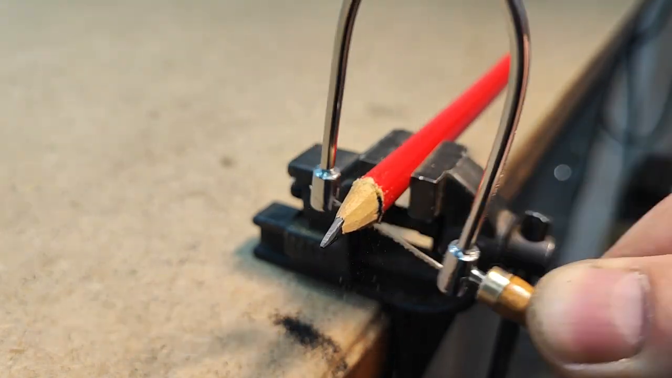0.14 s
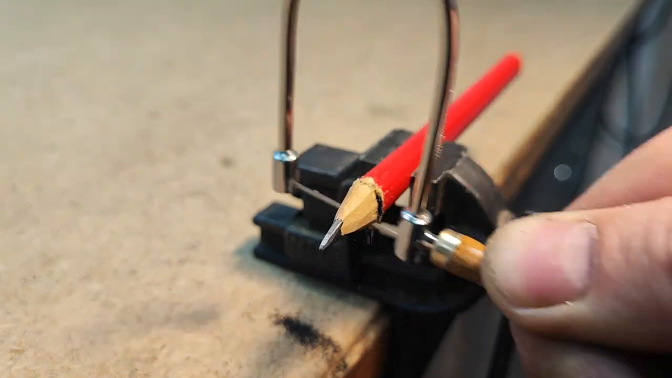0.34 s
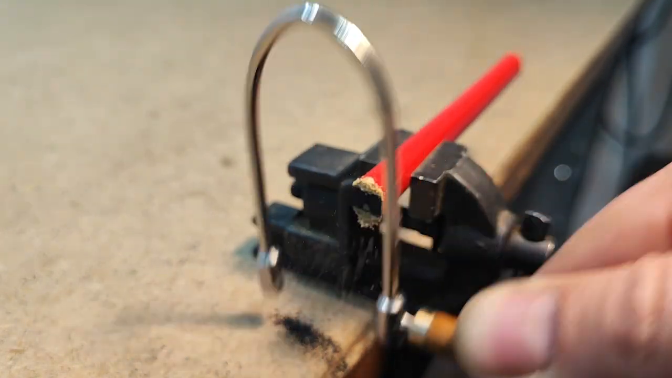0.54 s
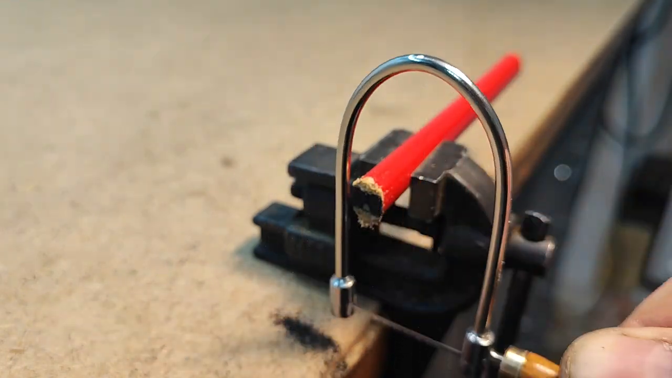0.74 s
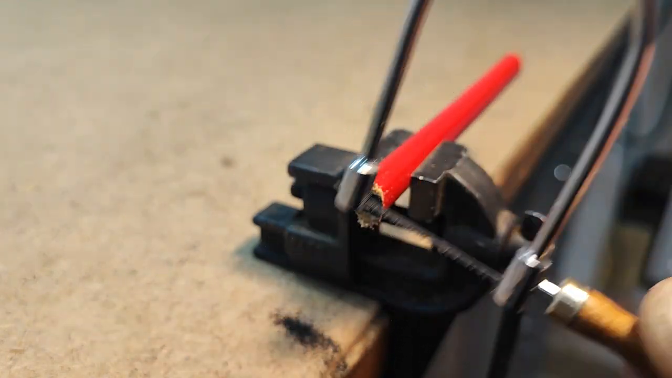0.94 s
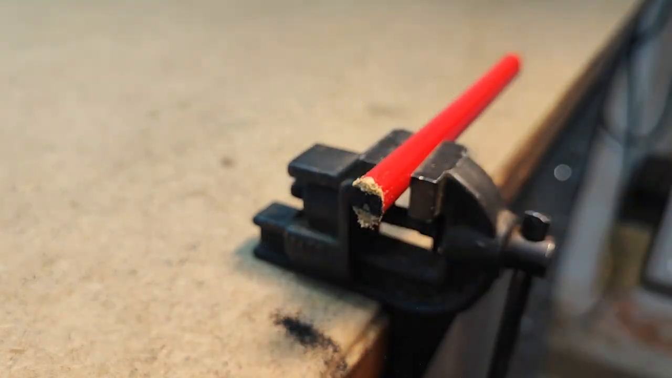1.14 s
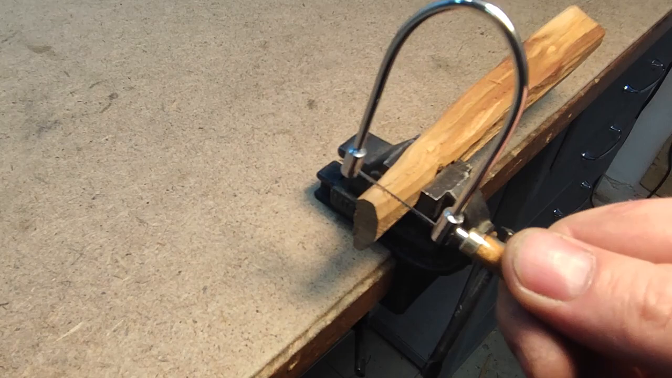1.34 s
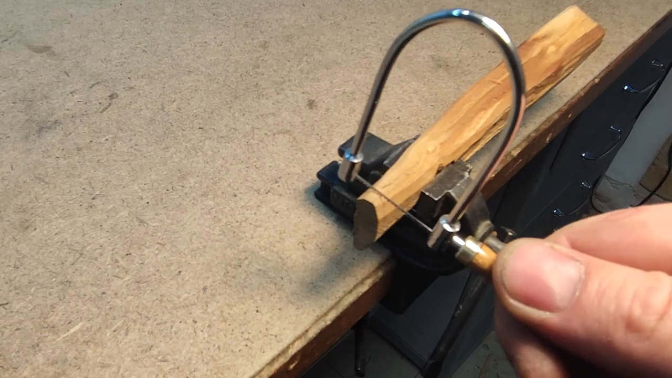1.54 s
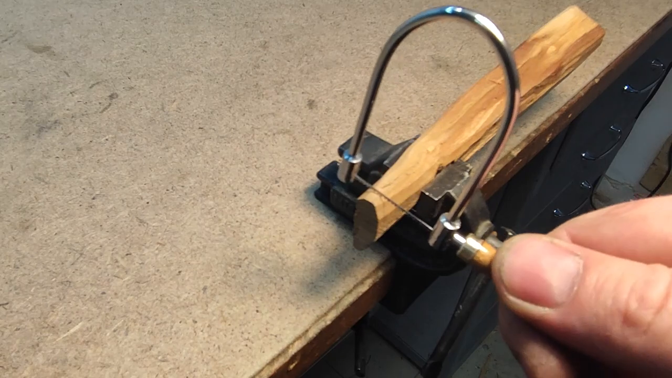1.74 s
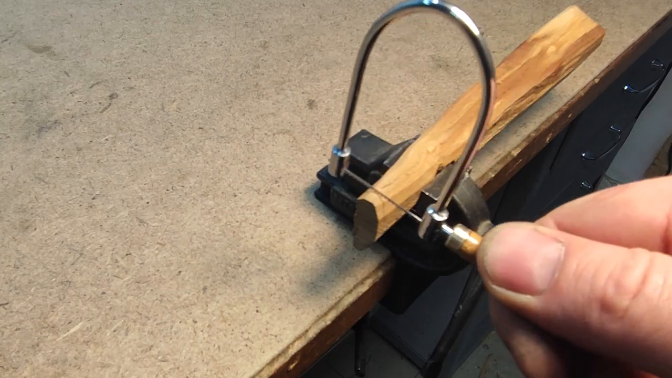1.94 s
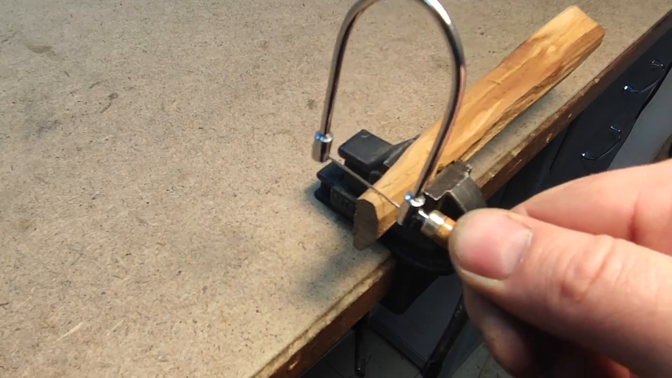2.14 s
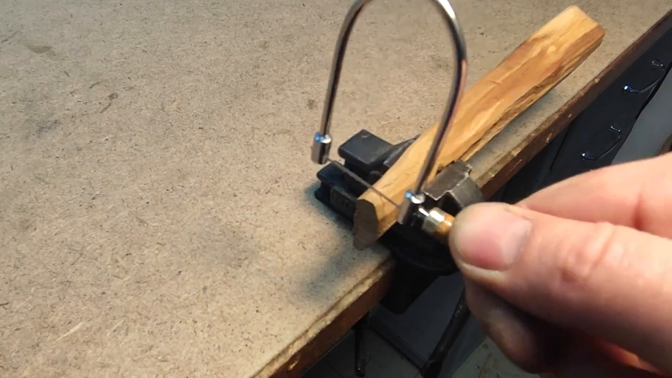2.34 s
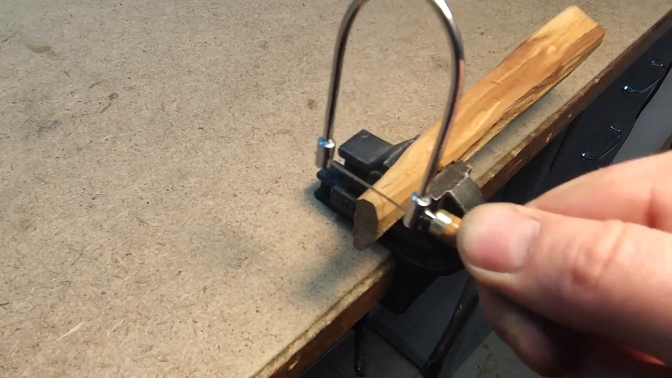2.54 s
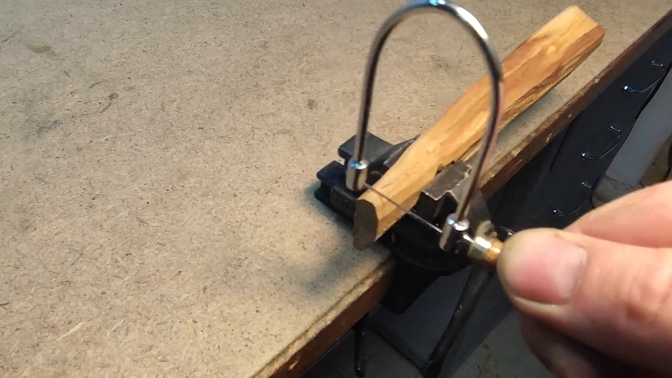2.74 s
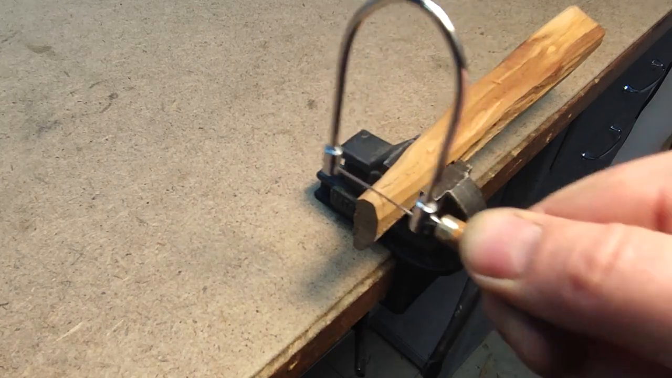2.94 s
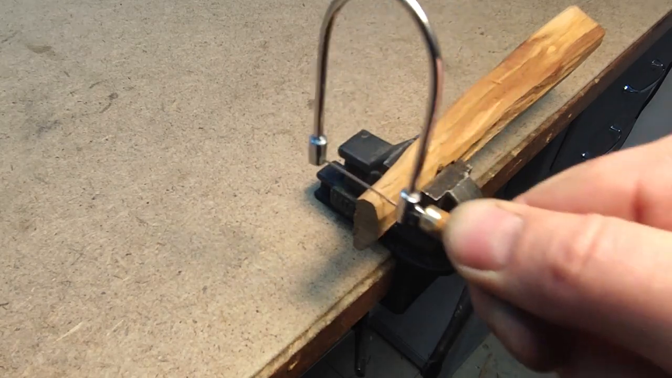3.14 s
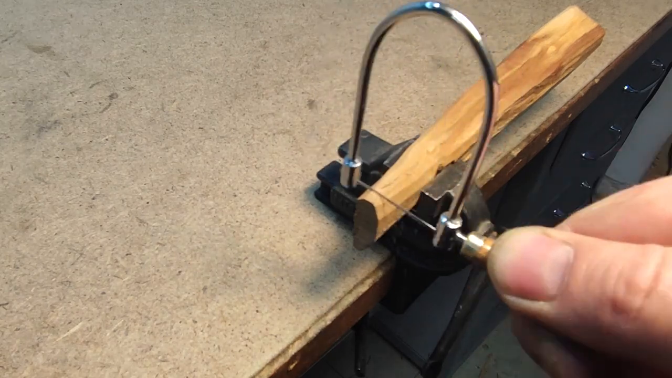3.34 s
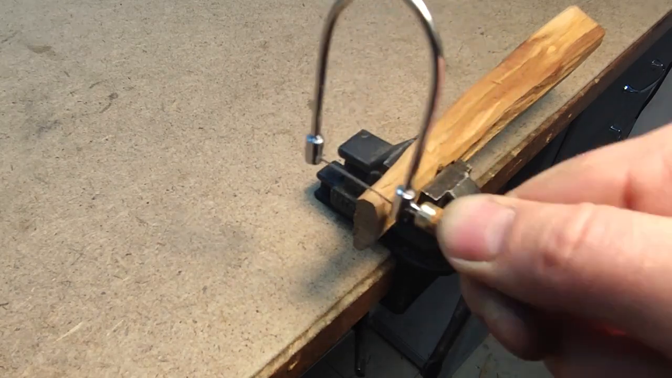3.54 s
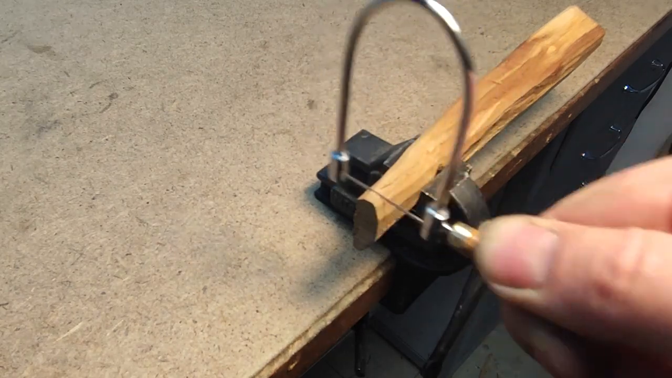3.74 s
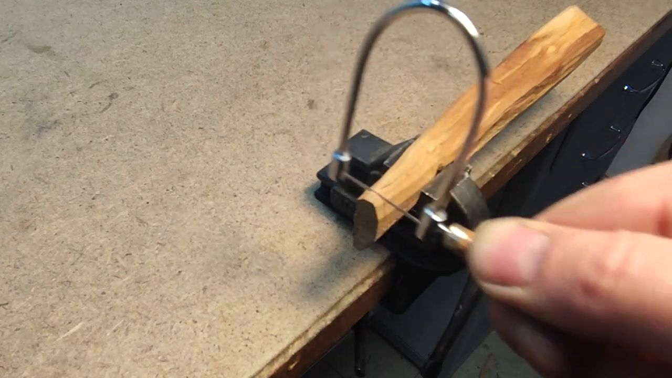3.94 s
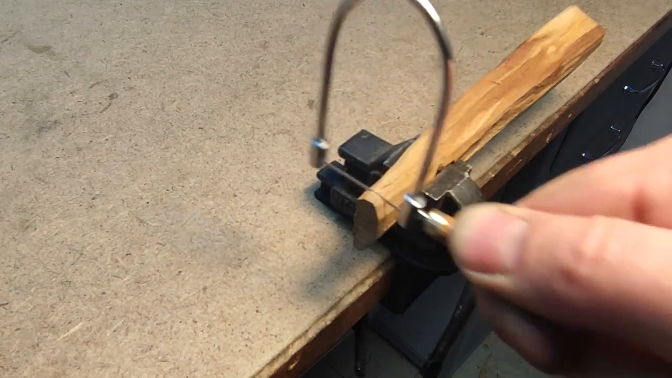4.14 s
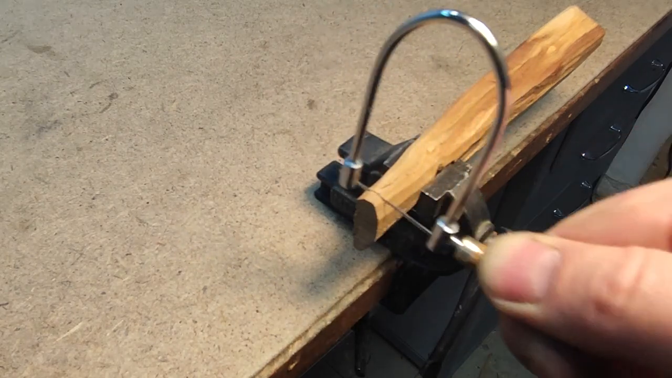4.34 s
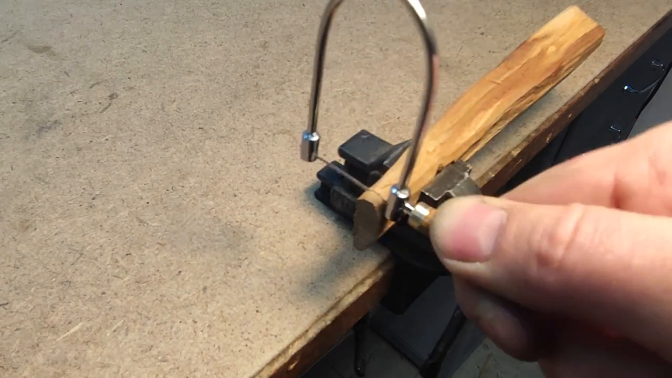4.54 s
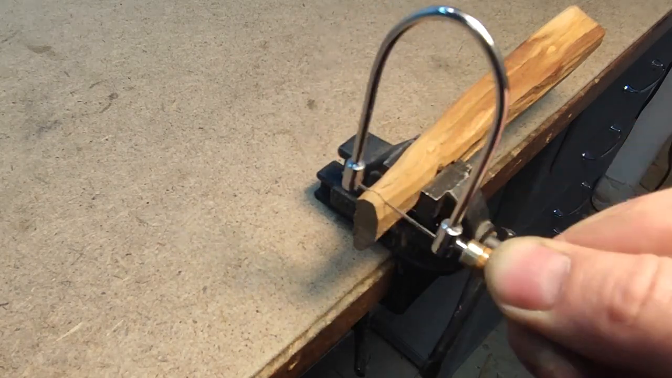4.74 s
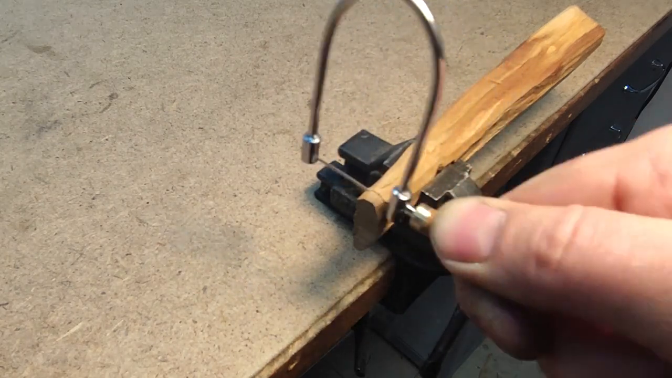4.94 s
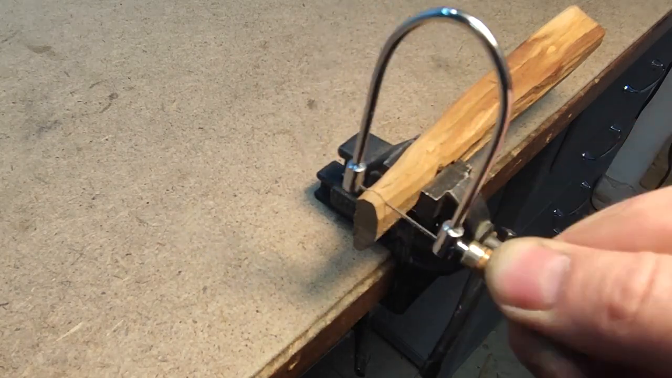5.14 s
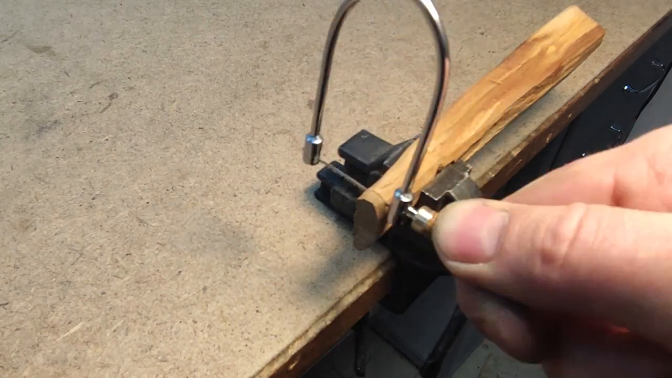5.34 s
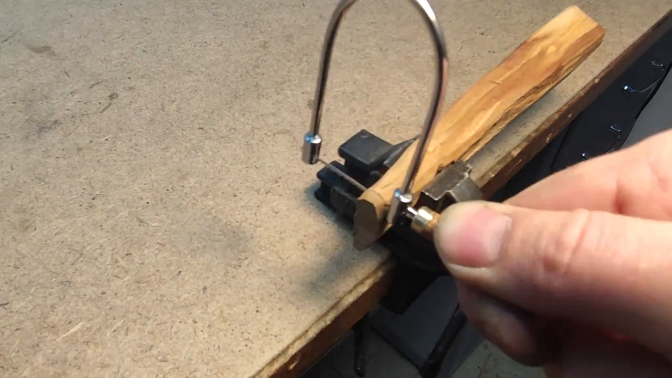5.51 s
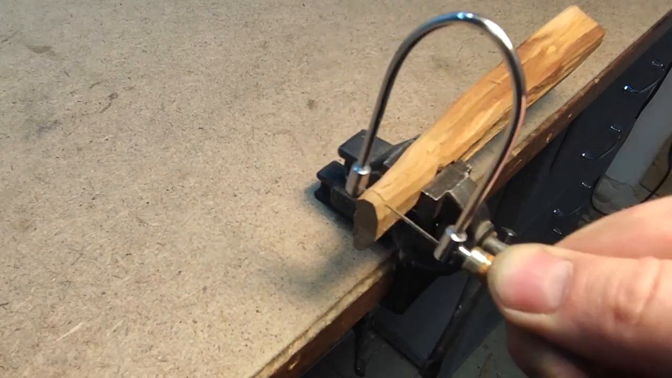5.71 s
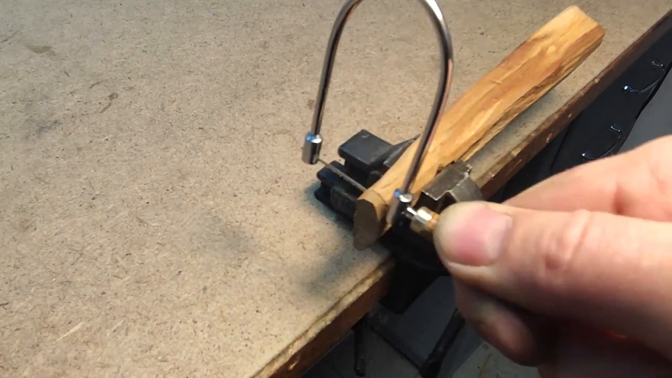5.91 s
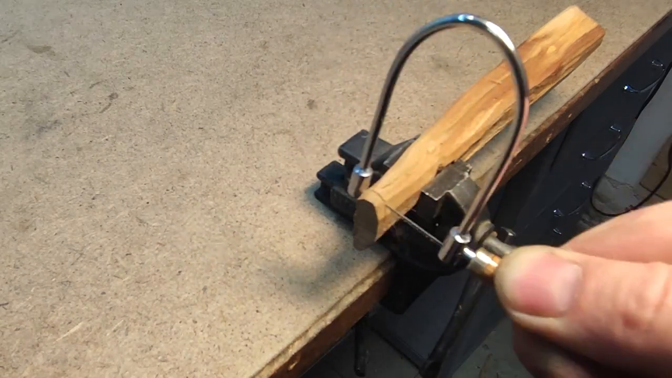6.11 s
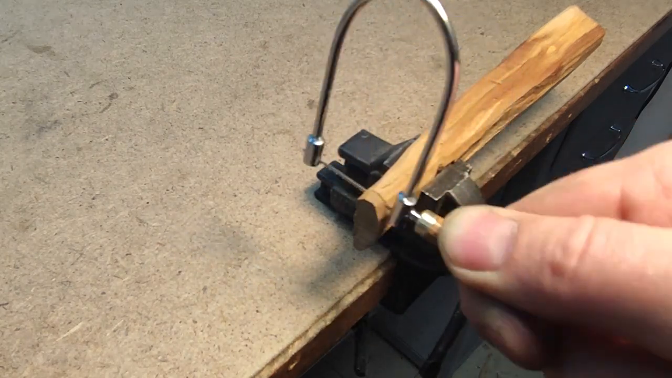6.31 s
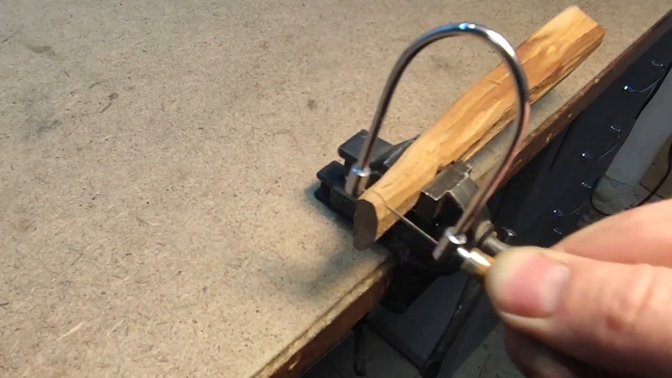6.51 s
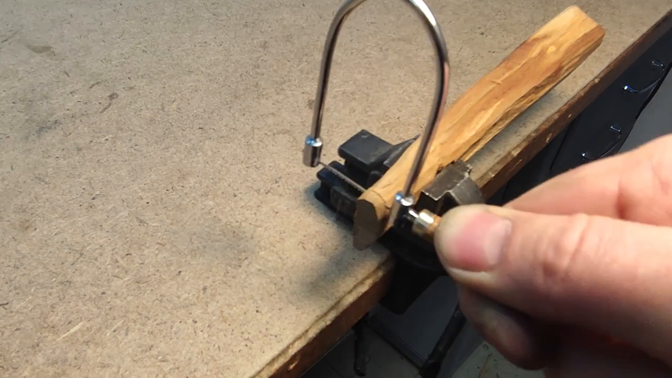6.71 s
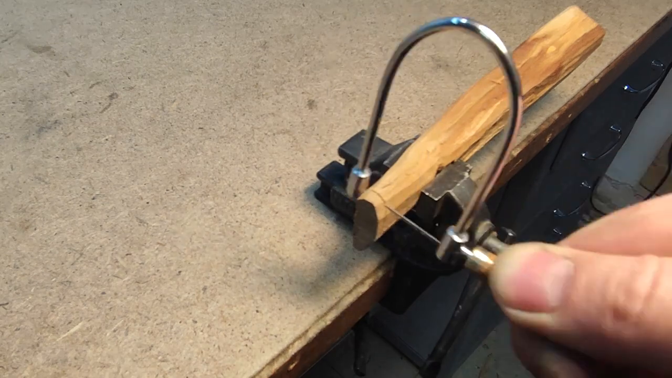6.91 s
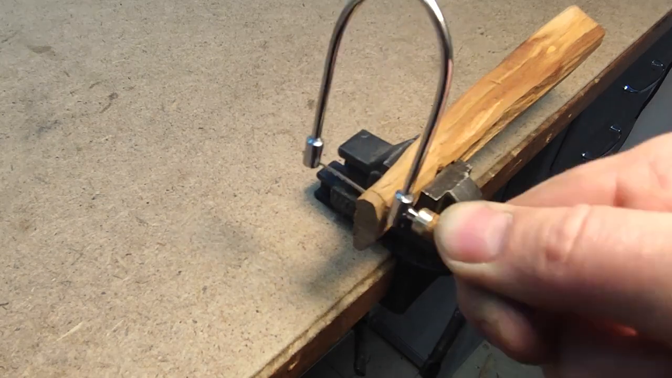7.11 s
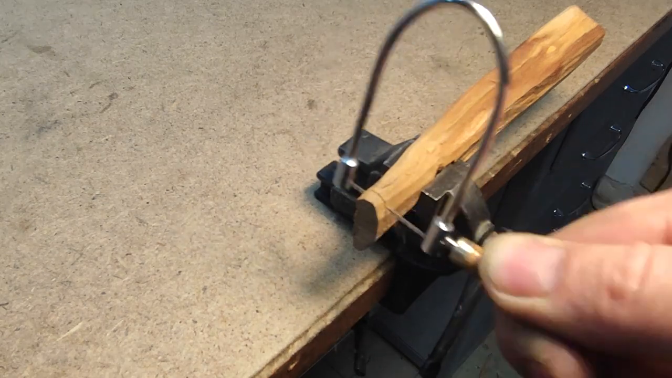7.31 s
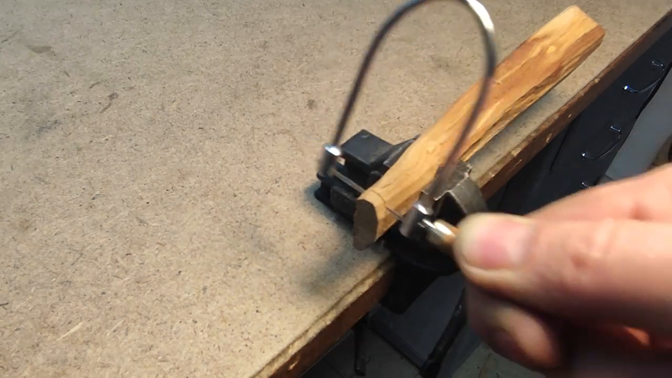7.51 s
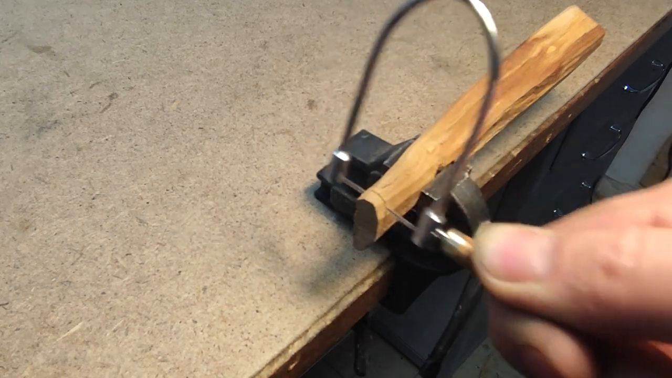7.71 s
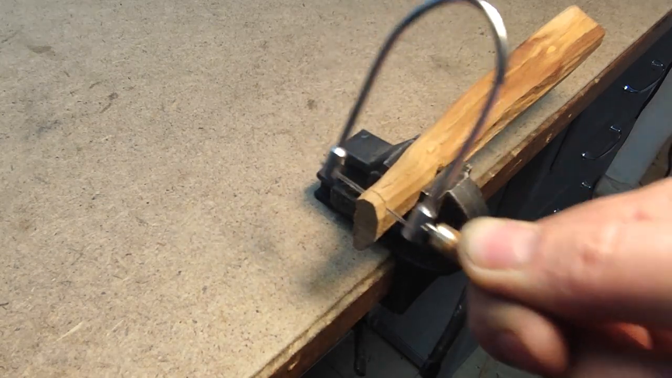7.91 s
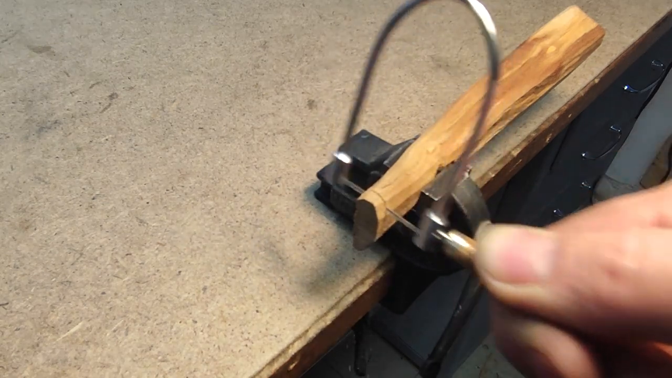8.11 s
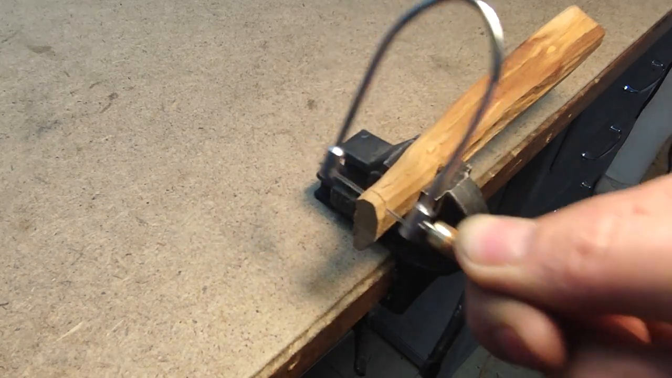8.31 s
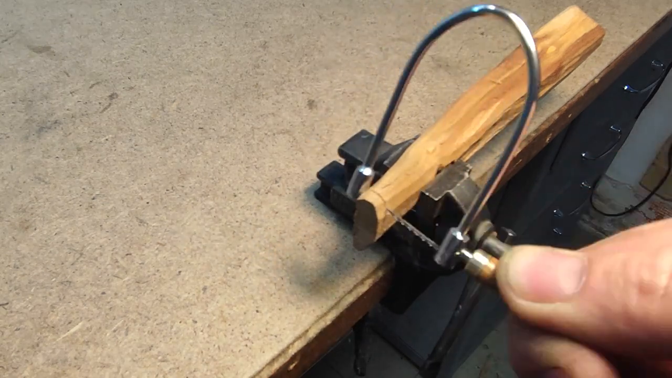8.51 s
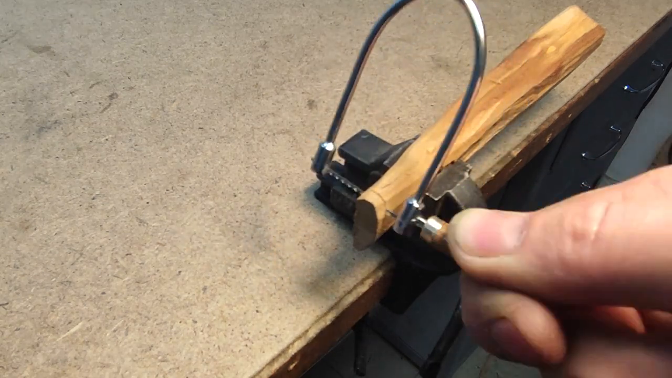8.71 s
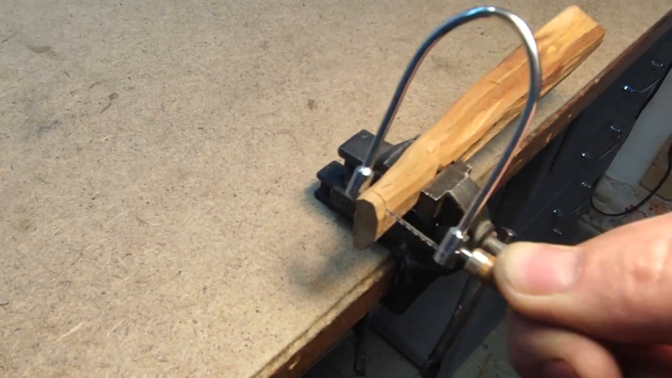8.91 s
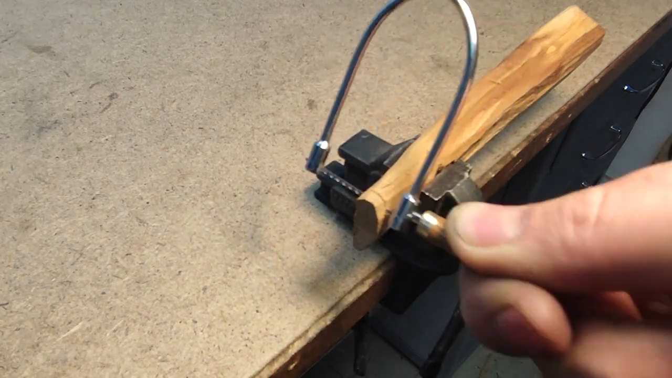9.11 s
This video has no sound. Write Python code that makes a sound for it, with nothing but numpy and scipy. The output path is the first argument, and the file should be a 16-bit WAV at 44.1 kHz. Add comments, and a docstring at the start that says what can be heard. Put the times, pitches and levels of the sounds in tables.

```python
"""A small coping saw works in quick, short strokes on a workbench, in a quiet room.
It cuts a pencil clamped in a little vise; the tip snaps off and rattles down. After a pause, with bumps
and a scuff, the blade is set on a wooden stick and saws about seven times a second to and fro.
Trains of tooth blows and noise of tearing fibres drive resonances of saw frame, wood and bench.
Decaying noise bursts make the cracks, bumps and scrapes; a short reverberation and room tone surround them."""
import sys
import numpy as np
from scipy import signal
from scipy.fft import rfft, irfft, next_fast_len
from scipy.io import wavfile

SR = 44100
rng = np.random.default_rng(int(sys.argv[2]) if len(sys.argv) > 2 else 0)


def store_pcm(level_fs):
    """Save levels as 16-bit WAV."""
    pcm = np.round(np.clip(level_fs, -1, 1) * 32767).astype(np.int16)
    wavfile.write(sys.argv[1], SR, np.atleast_2d(pcm).T)


N = 403956

# Resonant modes of the bench and of the clamped wood, as relative gains:
# (frequency [Hz], bandwidth [Hz], left [dB], right [dB])
BENCH_MODES = [(35, 60, -18, -17), (94.5, 14.5, -1.5, -6), (161.3, 45, -8, -11), (237, 56, -4, -3.5)]
WOOD_MODES = [(344, 30, -1, -.5), (414.7, 20.7, -1, 0.5), (512.6, 30, -4.5, -1), (570, 55, -5.5, -1.5),
              (616, 50, -8.5, -28), (717.5, 51, -6.5, -40), (782, 30, -17.5, -17), (885, 43, -12, -14),
              (967.4, 40, -9.5, -7), (1043, 65, -15.5, -16.5)]


def amp(db):
    """Level law: decibels to amplitude gain."""
    return 10 ** (np.asarray(db) / 20)


def unit(x):
    """Power normalisation: x scaled to rms 1."""
    return x / np.sqrt(np.mean(x ** 2) + 1e-20)


def along(points, hz):
    """Spectral envelope: (frequency, value) points interpolated on a logarithmic frequency axis."""
    point_hz, values = np.transpose(points)
    return np.interp(np.log(hz + 1), np.log(point_hz + 1), values)


def grid(size=4096):
    """Sampled spectrum: bin frequencies [Hz] of a short response, shifted by 1 Hz to avoid zero."""
    return np.fft.rfftfreq(size, 1 / SR) + 1


def resonances(modes):
    """Modal superposition: the powers of second-order resonances add, giving left and right gains."""
    hz = grid()
    power = 0
    for mode_hz, width_hz, left_db, right_db in modes:
        detuning = (hz * hz - mode_hz * mode_hz) / (hz * width_hz)
        power = power + amp([[left_db], [right_db]]) ** 2 / (1 + detuning ** 2)
    return np.sqrt(power)


def below(edge_hz, order=4):
    """Low-pass filtering: Butterworth gain that rolls off above an edge."""
    return 1 / np.sqrt(1 + (grid() / edge_hz) ** (2 * order))


def ring(gain):
    """Minimum phase: folding the cepstrum of a gain yields its causal impulse response, energy 1."""
    cepstrum = irfft(np.log(np.maximum(gain / gain.max(), 1e-6)))
    half = cepstrum.shape[-1] // 2
    fold = np.r_[1, np.full(half - 1, 2), 1, np.zeros(half - 1)]
    response = np.atleast_2d(irfft(np.exp(rfft(cepstrum * fold))))
    return response / np.sqrt(np.mean(np.sum(response ** 2, axis=1)))


def convolve(x, response):
    """Linear response: each channel convolved with an impulse response."""
    return signal.fftconvolve(np.atleast_2d(x), response, axes=1)


def sing(x, hz, width_hz, gain):
    """Resonant emphasis: one narrow mode is added on top of x."""
    return x + gain * signal.lfilter(*signal.iirpeak(hz, hz / width_hz, SR), x)


def echoes(t60, seconds):
    """Reverberation: exponentially decaying noise, independent on each side, energy 1."""
    t = np.arange(int(seconds * SR)) / SR
    tail = rng.standard_normal((2, len(t))) * amp(-60 * t / t60)
    return tail / np.linalg.norm(tail, axis=1, keepdims=True)


def diffuser(t60):
    """Phase dispersion: smears a tick in time on each side, with the spectrum mostly flattened."""
    spectrum = rfft(echoes(t60, seconds=.04), 4096)
    flattened = spectrum / np.abs(spectrum) ** .8
    return np.roll(irfft(flattened), 64, axis=1)[:, :2048]


def add(track, s, sound):
    """Superposition: mixes a sound into the track from time s, cut at the end."""
    start = max(round(s * SR), 0)
    track[:, start:start + sound.shape[1]] += sound[:, :max(N - start, 0)]


def follow(curve, s):
    """Linear interpolation: each column of a (time, ...) curve at time s."""
    times, *columns = np.transpose(curve)
    return np.array([np.interp(s, times, column) for column in columns])


def room_tone(db):
    """Stationary background noise: Gaussian noise shaped into a faint rumble and hiss."""
    # Relative spectral density of the room: (frequency [Hz], level [dB])
    room_spectrum = [(15, -14), (28, -8), (55, -4), (120, -11.5), (220, -12), (400, -19), (1000, -25.5),
                     (4500, -31.5), (8000, -36), (15800, -36.5)]
    colour = amp(along(room_spectrum, np.fft.rfftfreq(N, 1 / SR)))
    noise = rng.standard_normal((2, N))
    return amp(db) * unit(irfft(rfft(noise) * colour, N))


def strokes(pace, levels, favoured):
    """Reciprocating motion: timing, effort, tooth rate, ring and layer levels of every stroke."""
    # Nominal gesture, one row for the return, one for the cut:
    # (fastest part of stroke [0-1], hardest part of stroke [0-1], top rate of tooth blows [Hz])
    gesture = [(.43, .55, 184.8), (.49, .53, 221.2)]
    # The loose return wanders more; return, then cut: log scatter of (tooth rate [1], favoured ring [1])
    stray = [(.12, .22), (.03, .1)]
    # The return drags the teeth backwards and is softer: offset of (rasp [dB], wood [dB], bench [dB])
    return_offset_db = (-3, -2.5, -3)
    # No two strokes are quite alike: standard deviation of (rasp [dB], wood [dB], bench [dB])
    stroke_scatter_db = (.6, 1, 2)
    # Strokes that stand out, with their own bench and wood levels, tooth rate and ring:
    # (time [s], bench offset [dB], tooth rate [Hz], wood offset [dB], favoured ring [Hz])
    standout_strokes = [(.04, 1, 160.7, 0.5, 510), (.2, 3, 91.2, 1, 419), (2.7, 7, 225.6, 2.5, 414),
                        (2.78, 5, 214, 0, 344), (3.17, 6.5, 165.6, 1, 353), (3.39, 8, 227.8, -1.5, 340),
                        (3.88, 9, 165.6, -0.5, 385), (4.02, 5.5, 162.4, 0.5, 415), (4.36, 6, 225.7, 1, 413),
                        (4.5, 5.5, 225.7, 0.5, 412), (4.64, 4, 220.7, 0.5, 440), (4.92, 4.5, 210.2, 1, 350),
                        (5.06, 4.5, 212, -2, 563), (5.12, 5, 203.5, -1, 734), (5.19, 5, 220.6, 1, 352),
                        (5.26, -3, 210.4, 1.5, 414), (5.33, 0, 210, 1, 414), (5.4, 4, 162, 1, 410),
                        (5.47, -6, 205.3, 0, 415), (5.6, 5.5, 203.2, 2.5, 560), (5.74, 9, 228.3, -2.5, 540),
                        (5.87, -0.5, 240.6, 0.5, 516), (6.15, 6.5, 225, 0, 550), (6.69, 5.5, 223.4, 1, 403),
                        (6.96, 11, 226, -0.5, 420), (7.09, 1, 221, 1.5, 513), (7.29, 8.5, 161, -1.5, 950),
                        (8.04, 7.5, 221.5, -0.5, 520), (8.44, 6.5, 215, 2, 410), (8.7, 8, 228.4, 0, 344),
                        (8.83, 8, 213.3, 1.5, 420), (8.96, 9, 220, 1.5, 570)]

    times, numbers = np.transpose(pace)
    count = np.arange(round(numbers[0]), round(numbers[-1]) + 1)
    turns = np.interp(count, numbers, times)
    chances = rng.standard_normal((len(count), 5))
    wood_hz = np.array([mode[0] for mode in WOOD_MODES])
    rows = []
    for number, start, end, chance in zip(count, turns, turns[1:], chances):
        cutting, middle = number % 2, (start + end) / 2  # odd strokes cut
        fastest, hardest, tooth_hz = gesture[cutting]
        nominal_hz = np.array([tooth_hz, *follow(favoured, middle)])
        tooth_hz, wanted_hz = nominal_hz * np.exp(chance[:2] * stray[cutting])
        ring_hz = wood_hz[np.argmin(np.abs(wood_hz - wanted_hz))]  # nearest mode of the wood
        extra_db = chance[2:] * stroke_scatter_db
        for s, bench_db, own_tooth_hz, wood_db, own_ring_hz in standout_strokes:
            if start <= s < end:
                tooth_hz, ring_hz, extra_db = own_tooth_hz, own_ring_hz, (0, wood_db, bench_db)
        layers_db = follow(levels, middle) + (1 - cutting) * np.array(return_offset_db) + extra_db
        rows.append((cutting, (start, end - start, fastest, hardest, tooth_hz, ring_hz, *layers_db)))
    return rows


def bite(part, middle, cutting):
    """Contact force: how hard the teeth grip along a stroke whose effort centres on middle."""
    # Grip before the stroke is skewed: (part of stroke [0-1], return [dB], cut [dB])
    grip_curve = [(0, -5.5, -22), (.125, -7.5, -12.5), (.195, -3, -4), (.4, 1, 0.5), (.6, 1, 0.1),
                  (.75, -3.5, -5.5), (.87, -9.5, -11.5), (1, -13.5, -18)]
    where, *bite_db = np.transpose(grip_curve)
    lean = np.clip(1.54 * (middle - (.5 if cutting else .47)), -.3, .3)
    skewed_part = part - lean * np.sin(np.pi * part)
    return amp(np.interp(skewed_part, where, bite_db[cutting]))


def teeth(part, top_hz, jitter, scatter_db):
    """Periodic impact excitation: blows of single teeth, at a rate set by blade speed, and their phase."""
    speed = .45 + .55 * np.sin(np.pi * part)  # speeds up, then slows to the turn
    unsteady = np.interp(part, np.linspace(0, 1, num=10), rng.standard_normal(10))
    rate_hz = top_hz * speed * np.exp(jitter * unsteady)
    turns = np.cumsum(rate_hz) / SR + rng.random()
    passing = np.diff(np.floor(turns), prepend=0) > 0
    strength = amp(scatter_db * rng.standard_normal(len(part)))
    return unit(passing * strength), turns % 1


def grit(size, rate, spread_db):
    """Random impulse excitation: tearing fibres tick with very uneven strength, rms 1."""
    torn = rng.random(size) < rate / SR
    ticks = torn * amp(spread_db * np.clip(rng.standard_normal(size), -2, 2))
    return unit(ticks * rng.standard_normal((2, size)))


def stroke(row, cutting, bodies):
    """Source-filter principle: tooth blows and tearing fibres excite frame, wood and bench."""
    _, length, fastest, hardest, tooth_hz, ring_hz, *levels = row
    size = int(length * SR)
    part = np.arange(size) / size
    speed, force = bite(part, fastest, cutting), bite(part, hardest, cutting)
    blows, phase = teeth(part, tooth_hz, jitter=.07, scatter_db=3.5)
    # the right side is shifted a quarter turn in phase, so the blows sound wide
    blows = np.array([blows, np.imag(signal.hilbert(blows))])
    # fibres give way just after a tooth strikes
    tearing = unit(1 + 0.59 * np.exp(-phase / .3))
    thump = force ** 1.03 * (0.66 * blows + 0.86 * grit(size, rate=900, spread_db=3.5))
    chatter = (force * speed) ** 0.37 * (0.37 * blows + grit(size, rate=2600, spread_db=2.5))
    fibres = grit(size, rate=5000, spread_db=2) + 0.76 * rng.standard_normal((2, size))
    rasp = speed ** 1.136 * tearing * fibres
    frame, wood, bench = bodies
    rasp, chatter, thump = convolve(rasp, frame), convolve(chatter, wood), convolve(thump, bench)
    # pressure and grip differ with each pass, so each favours other resonances
    chatter = sing(chatter, ring_hz, width_hz=43.0, gain=1.19)
    thump = sing(thump, tooth_hz, width_hz=35.0, gain=1.62)
    rasp = sing(rasp, rng.uniform(4910, 7070), width_hz=160, gain=0.78)
    rasp = sing(rasp, rng.uniform(8580, 9800), width_hz=220, gain=0.96)
    rasp = sing(rasp, rng.uniform(938, 1708), width_hz=28, gain=1.8)
    layers = rasp, chatter, thump
    # energy, tail included, set to that of rms 1 over the stroke
    return [amp(db) * x * np.sqrt(2 * size / np.sum(x ** 2)) for db, x in zip(levels, layers)]


def sawing(passes, rasp_colour, frame_modes, rasp_db, wood_db, bench_db):
    """Structural radiation: strokes sound through the saw frame, the clamped wood and the bench top."""
    plain_rasp = amp(along(rasp_colour, grid()))
    frame = ring(plain_rasp * np.sqrt(1 + resonances(frame_modes) ** 2))
    wood = ring(resonances(WOOD_MODES) * below(1690) * (1 - below(263)))
    bench = ring(resonances(BENCH_MODES) * below(328))
    bodies = convolve(frame, diffuser(t60=0.027)), wood, bench
    track = np.zeros((2, N))
    for cutting, row in passes:
        for db, sound in zip((rasp_db, wood_db, bench_db), stroke(row, cutting, bodies)):
            add(track, row[0], amp(db) * sound)
    return track


def snaps(rise, t60, knock_t60, ring_db):
    """Fracture and impact: noise bursts for splintering and bounces, with knocks in vise and bench."""
    # The tip cracks off, hits the vise and bounces, as relative levels:
    # (time [s], crack [dB], treble roll-off [Hz], knock [dB])
    snap_events = [(0.5574, -39.5, 9000, -34.5), (0.5639, -28.5, 7000, -40), (.578, -39, 6000, -55),
                   (0.5913, -34.5, 11000, -40), (0.597, -32, 2600, -36.5), (.612, -39.5, 3000, -38.5),
                   (.639, -38.5, 8000, -59), (0.67, -39, 2840, -60), (.688, -34.5, 18000, -68),
                   (.705, -48, 14000, -73), (.716, -51.5, 3000, -70), (.7692, -61, 2200, -80),
                   (0.8594, -61, 6000, -61), (.88, -67, 4000, -66)]
    # Relative spectrum of the cracks before their roll-off: (frequency [Hz], level [dB])
    splinter_spectrum = [(500, -35), (1100, -8.5), (1500, -1.5), (1950, 2.5), (2700, -5), (3500, -1.5),
                         (4100, -5), (5100, -1.5), (7500, -8), (11000, -6.5), (15800, -9)]
    track, t = np.zeros((2, N)), np.arange(SR // 8) / SR
    body = ring(np.hypot(resonances(WOOD_MODES), 2.0 * resonances(BENCH_MODES)) * below(1500))
    decay = amp(-60 * np.maximum(t - rise, 0) / t60)
    lingering = amp(ring_db - 60 * t / 0.13)
    burst = np.minimum(t / rise, 1) * (decay + lingering)
    for s, db, dull_hz, knock_db in snap_events:
        colour = ring(amp(along(splinter_spectrum, grid())) * below(dull_hz, order=3))
        crack = convolve(burst * rng.standard_normal((2, len(t))), colour)
        add(track, s, amp(db) * crack)
        knock = convolve(amp(-60 * t / knock_t60) * rng.standard_normal((2, len(t))), body)
        add(track, s, amp(knock_db + 1.0) * knock)
    return track


def bump(s, db, pitch_hz, t60):
    """Soft impact: a slow-rising noise push of the hand excites two low, dull modes of the bench."""
    track, t = np.zeros((2, N)), np.arange(SR // 6) / SR
    push = np.minimum(t / 0.0072, 1) * amp(-60 * t / t60) * rng.standard_normal((2, len(t)))
    body = ring(resonances([(148, 70, 0, -2), (pitch_hz, 60, 0, 0)]) * below(540))
    add(track, s, amp(db) * convolve(push, body))
    return track


def scuff(s, db, t60, dull_hz):
    """Sliding friction: a short, bright two-stage noise decay as the blade is set on the stick."""
    track, t = np.zeros((2, N)), np.arange(SR // 4) / SR
    early = amp(-60 * np.maximum(t - .02, 0) / t60)
    late = amp(-9 - 60 * t / 1.0)
    hiss = np.minimum(t / .012, 1) * (early + late) * rng.standard_normal((2, len(t)))
    add(track, s, amp(db) * convolve(hiss, ring(below(dull_hz, order=1))))
    return track


def drag(s, db, t60, pitch_hz):
    """Frictional excitation: a low, fading scrape of random ticks as the blade settles into the wood."""
    track, t = np.zeros((2, N)), np.arange(SR // 4) / SR
    rub = np.minimum(t / 0.026, 1) * amp(-60 * t / t60) * grit(len(t), rate=2600, spread_db=2.5)
    body = ring(resonances(WOOD_MODES) * below(1500))
    add(track, s, amp(db) * sing(convolve(rub, body), pitch_hz, width_hz=38, gain=1.6))
    return track


def snags(t60, db):
    """Stick and release: a tooth catches in the grain and breaks free with a woody tick."""
    # Teeth catching, levels relative to the common gain db: (time [s], level [dB])
    snag_events = [(3.605, -43), (4.082, -41), (4.169, -35), (4.301, -27.5), (4.438, -38), (4.582, -34.5),
                   (6.008, -36), (6.631, -41), (8.297, -55), (8.432, -48)]
    track, t = np.zeros((2, N)), np.arange(SR // 20) / SR
    body = ring(resonances([(560, 240, 2, 2.2), (1270, 650, 0.15, 0)]) * below(2000))
    for s, snag_db in snag_events:
        tick = amp(-60 * t / t60) * rng.standard_normal((2, len(t)))
        add(track, s, amp(db + snag_db) * convolve(tick, body))
    return track


def scene():
    """Superposition of both cuts, the falling tip and the handling, with reverberation and room tone."""
    # Pace of the hand, even between these turns: (time [s], number of the stroke that starts then [1])
    pencil_pace, stick_pace = [(0, 0), (.323, 4), (.509, 6), (.579, 7)], [(2.135, 2), (2.238, 3), (2.427, 5), (3.058, 13),
                                                    (3.358, 17), (3.784, 23), (4.183, 29), (4.748, 37),
                                                    (6.25, 59), (7.327, 75), (7.606, 79), (8.407, 91),
                                                    (9.055, 101), (9.183, 103)]
    # Nominal level of a cutting stroke in each layer: (time [s], rasp [dB], wood [dB], bench [dB])
    pencil_levels, stick_levels = [(.04, -47.5, -35.5, -38), (.13, -49.5, -37.5, -44),
                                   (.28, -53, -40.5, -36.5), (.38, -55, -44, -42.5), (.46, -55, -44, -43.5),
                                   (.54, -51, -41, -48)], [(2.18, -65.5, -55.5, -47),
                                                          (2.29, -55.5, -42.5, -40.5),
                                                          (2.5, -52, -38.5, -45), (2.76, -49.5, -39, -46),
                                                          (2.96, -51, -39.5, -47), (3.55, -45, -35, -45.5),
                                                          (3.9, -45.5, -33.5, -42.5),
                                                          (4.33, -42, -30.5, -36.5),
                                                          (4.85, -43.7, -33, -39), (5.5, -43.5, -31, -40),
                                                          (6.6, -43.5, -32.5, -38.5),
                                                          (7.4, -44.5, -35, -47), (7.65, -43, -34, -46.5),
                                                          (8.15, -44, -34, -40), (9.1, -44, -32, -41)]
    # Nominal ring that the wood favours as the cut deepens: (time [s], frequency [Hz])
    pencil_ring, stick_ring = [(0, 515), (.3, 340)], [(2.3, 450), (3.1, 345), (3.6, 415), (5.5, 415),
                                                    (5.65, 535), (6.5, 535), (6.8, 431), (7.5, 515),
                                                    (9.1, 535)]
    # Relative spectrum of the plain rasp: (frequency [Hz], level [dB])
    pencil_rasp, stick_rasp = [(600, -29), (1050, -11), (1600, -10.5), (2500, -6), (4000, -8.5), (5500, -8),
                               (7000, -12.5), (9300, -9.5), (11000, -15), (12300, -18), (15800, -25)], [(600, -23.5), (1150, 1.5), (1600, -2), (2200, -7.5),
                                                    (3200, -9.5), (4200, -7.5), (5000, -4.5), (5700, -1),
                                                    (6500, -6), (7500, -13), (9300, -9), (10100, -10),
                                                    (11300, -18), (15800, -25.5)]
    # Ring of blade and frame over the rasp: (frequency [Hz], bandwidth [Hz], left [dB], right [dB])
    pencil_frame, stick_frame = [(1435, 71, 6, 15), (2900, 160, 3, 6), (5960, 220, 3, 14.5),
                                 (8100, 700, 0, 6)], [(1635, 270, 3.5, -14), (2760, 266, 4.5, 8),
                                                       (3454, 48, -15, 7.5), (4900, 270, -17, 7),
                                                       (5330, 120, -13, -10), (5816, 91, -12, 4.5),
                                                       (7000, 170, 2.5, 3.5), (7660, 380, -17, 5),
                                                       (8910, 160, -23, 3.5), (9450, 300, -4.5, -5)]

    pencil = strokes(pencil_pace, pencil_levels, pencil_ring)
    stick = strokes(stick_pace, stick_levels, stick_ring)
    # the two-row gains are left and right balance [dB]
    work = sawing(pencil, pencil_rasp, pencil_frame,
                  rasp_db=-0.5, wood_db=-1.3, bench_db=0.0) * amp([[1.3], [-1.5]])
    work += snaps(rise=0.0026, t60=0.036, knock_t60=0.097, ring_db=-13.0) * amp([[1.5], [-1.5]])
    work += bump(s=1.405, db=-49.5, pitch_hz=300, t60=0.089)
    work += scuff(s=1.944, db=-55.5, t60=0.086, dull_hz=7000)
    work += bump(s=1.95, db=-47, pitch_hz=330, t60=0.14)
    work += drag(s=1.975, db=-52, t60=.35, pitch_hz=413)
    work += sawing(stick, stick_rasp, stick_frame,
                   rasp_db=-0.35, wood_db=-0.36, bench_db=-0.37) * amp([[.15], [-.15]])
    work += snags(t60=0.053, db=2)
    reflected = convolve(work, echoes(t60=0.16, seconds=.25))[:, :N]
    return work + amp(-12) * reflected + room_tone(db=-66)


def record(dry):
    """Band limitation: an ideal low-pass removes all components from the top frequency upwards."""
    top_hz = 15850
    size = next_fast_len(N + SR // 2)
    passed = np.fft.rfftfreq(size, 1 / SR) < top_hz
    return irfft(rfft(dry, size) * passed, size)[:, :N]


dry = scene()
out = record(dry)
store_pcm(out)
```